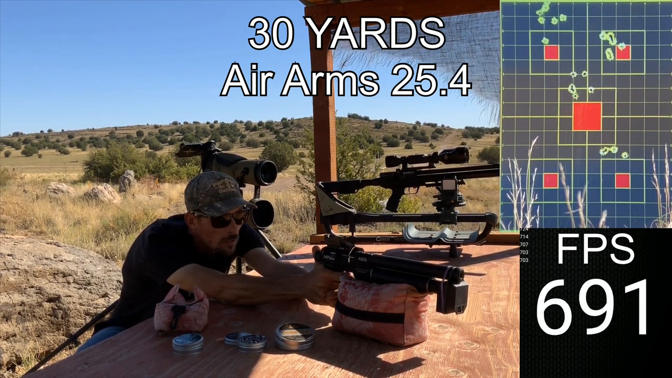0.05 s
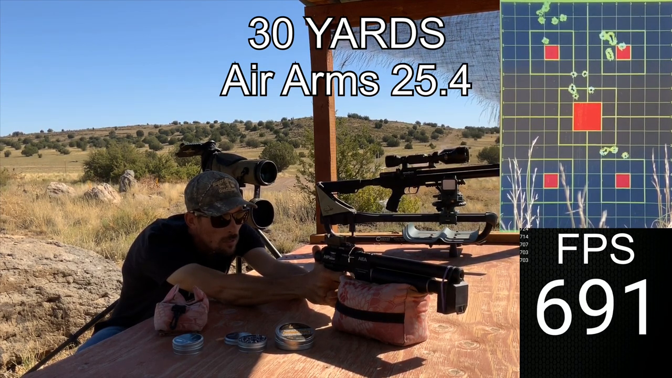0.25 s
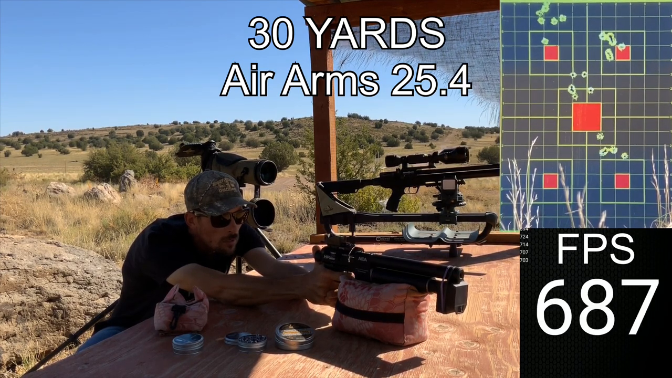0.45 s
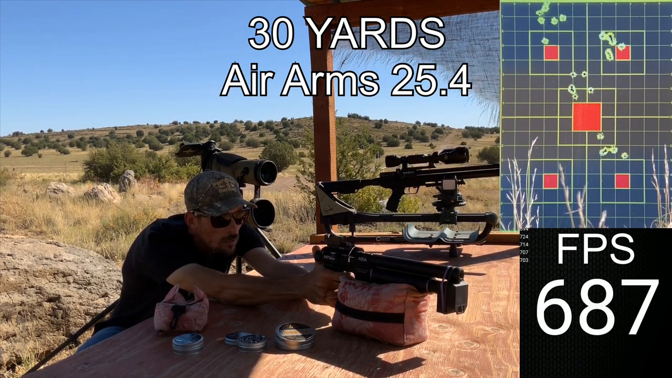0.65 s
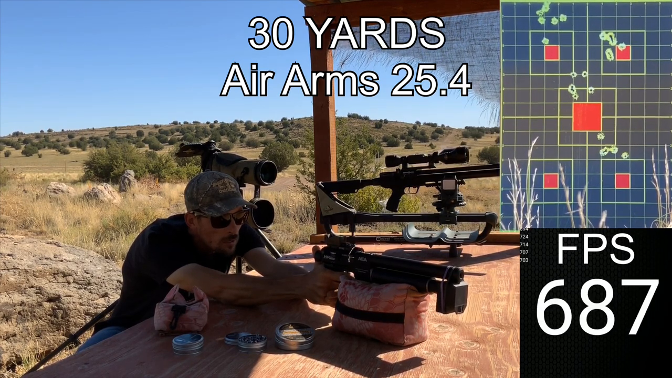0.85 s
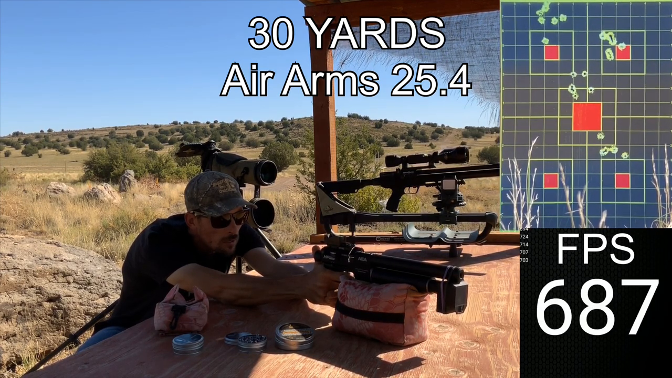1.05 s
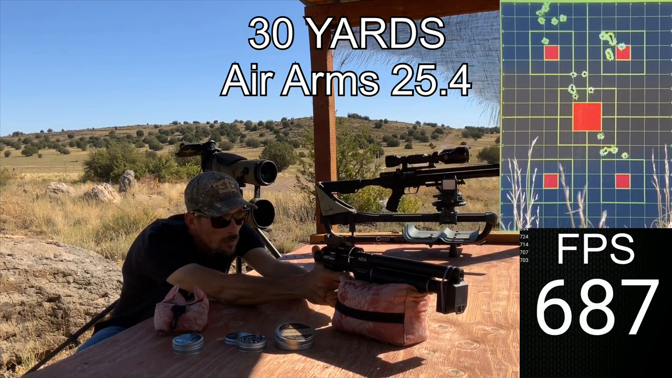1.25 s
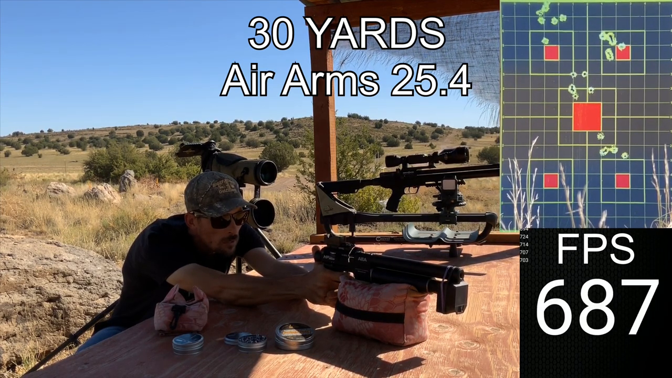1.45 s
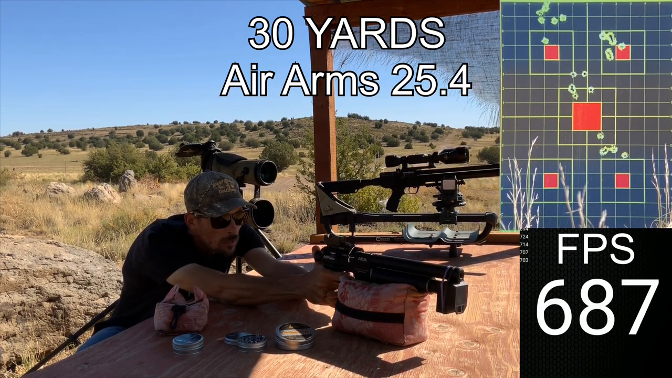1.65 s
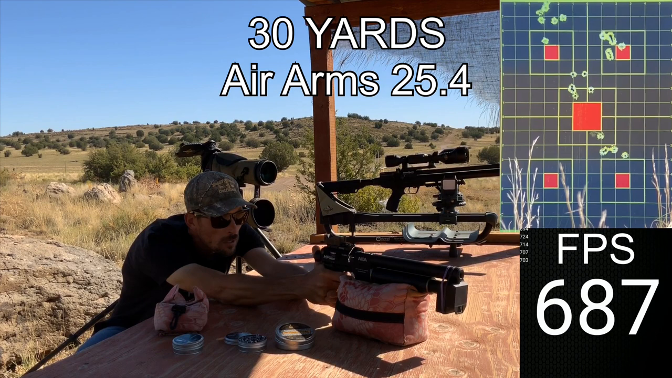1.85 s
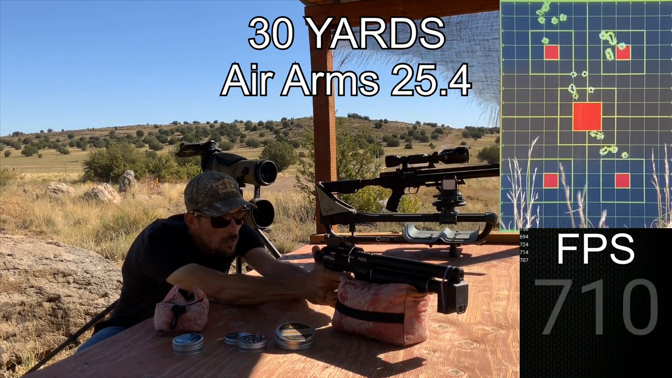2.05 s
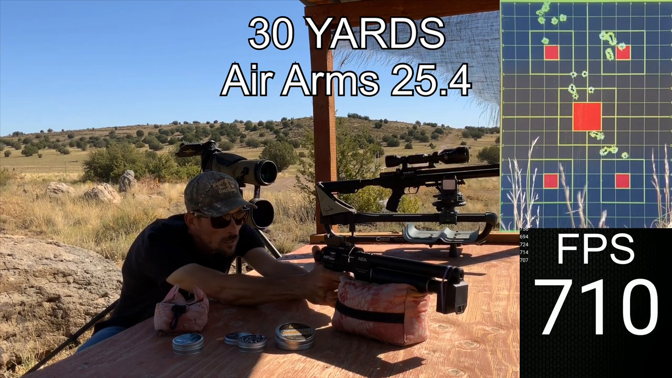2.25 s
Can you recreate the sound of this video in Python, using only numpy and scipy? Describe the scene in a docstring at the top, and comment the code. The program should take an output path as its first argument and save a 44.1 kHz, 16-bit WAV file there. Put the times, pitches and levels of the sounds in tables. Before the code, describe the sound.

Two sharp air pistol shots with short echoes, the pellets clinking on distant metal.

```python
"""Outdoor range, stereo microphone by a wooden bench under a shelter; a distant motor hums faintly.
At 0.2 s an air pistol fires close by: a sharp blast of air, a clack of the action, a low boom of the
bench, a wash from shelter and hillside. A quarter second later the pellet is heard hitting the target
and its ringing metal backstop downrange. The hum swells and sinks, and at 1.75 s comes a second shot,
followed by a dull knock, some clatter and light ticks of handling."""
import sys
import numpy as np
from scipy import signal
from scipy.fft import rfft, irfft
from scipy.io import wavfile
from scipy.ndimage import uniform_filter1d

SR = 44100
rng = np.random.default_rng(int(sys.argv[2]) if len(sys.argv) > 2 else 0)


def int16_out(signal):
    """Quantize to a 16-bit WAV file."""
    q = np.round(np.clip(np.atleast_2d(signal).T, -1, 1) * 32767)
    wavfile.write(sys.argv[1], SR, q.astype(np.int16))


N = 101430

# the two shots: start_s, level_db
SHOTS = [(0.200, 1), (1.7538, 1)]
# bursts at the pistol, close to the microphone: delay_s, level_db, attack_s, hold_s, t60_s
BLAST = [(-0.0082, -13.5, 0.014, .008, 0.097)]
CLACKS = [(.0428, -14, 0.00065, 0.0042, .03), (.047, -24, 0.0013, .003, 0.047)]
VENT = [(.0548, -12, 0.0016, .002, 0.027), (.061, -25.5, .003, .003, 0.1)]
CLOSING = [(.0585, -17.5, 0.0014, 0.003, 0.059)]
# their spectra: frequency_hz, gain_db
BLAST_COLOUR = [(150, -45.5), (250, -11.5), (651, -11), (906, 3), (1060, -7), (1240, -3.5), (1670, -4),
                (2400, -14.5), (2620, -5), (3580, -5.5), (4340, -1.5), (6820, 0.5), (7840, -9.5),
                (11700, -19), (16000, -30.5)]
CLACK_COLOUR = [(150, -5), (300, -4), (560, -4), (850, -1.5), (1400, -5.5), (3100, -13), (5400, -6),
                (7500, -11.5), (12000, -17.5), (16000, -21)]
VENT_COLOUR = [(400, -9.5), (700, -6.5), (1200, -3), (2600, -13), (4500, -6.5), (7500, -8.5), (9500, -4),
               (11000, 2), (13000, -9.5), (15800, -4)]
CLOSING_COLOUR = [(200, -0.5), (380, 4), (560, -11.5), (850, -3), (1700, -2), (2600, -18), (5400, -12),
                  (8000, -21), (16000, -28)]
# stereo width up close: frequency_hz, side_minus_mid_db
BLAST_WIDTH = [(200, -23), (1000, -24.5), (2000, -13.5), (4000, -29), (15000, -25.5)]
CLACK_WIDTH = [(150, -4), (400, -3), (1000, -4.5), (2000, 2.5), (5000, -1.5), (12000, -7.5)]
NEAR_WIDTH = [(200, -13), (400, -16.5), (1000, -11.5), (2000, -4), (5000, -8), (9000, -21), (15000, -27.5)]

def pistol():
    """Close by, air leaves the muzzle; the action clacks open, vents a bright spit and closes."""
    blast = each_shot(BLAST, BLAST_COLOUR, BLAST_WIDTH)
    clacks = each_shot(CLACKS, CLACK_COLOUR, CLACK_WIDTH)
    vent = each_shot(VENT, VENT_COLOUR, NEAR_WIDTH)
    closing = each_shot(CLOSING, CLOSING_COLOUR, NEAR_WIDTH)
    return blast + clacks + vent + closing


# pushes on the bench after each shot: delay_s, level_db
PUSHES = [(.0179, -11), (0.0255, -5.5), (0.0301, -2.2), (.051, 2), (0.0852, -9)]
# modes of the bench top: pitch_hz, level_db, t60_s
BENCH_MODES = [(77.3, -21, .46), (123.8, -23, 0.66), (132.2, -17, 0.45), (153.6, -24, .21),
               (197.5, -37.5, .15), (279, -40.5, .25)]
# loose wood shaking: delay_s, level_db, attack_s, hold_s, t60_s
RUMBLE = [(.02, -36, 0.024, 0.013, 0.15)]
# its spectrum: frequency_hz, gain_db
RUMBLE_COLOUR = [(70, -7), (120, 2.5), (200, 0.5), (400, -7), (600, -23)]
# its width: frequency_hz, side_minus_mid_db
RUMBLE_WIDTH = [(100, -5.5), (400, -6.5)]

def bench():
    """Under the pistol, the shot and the action push the bench top, which booms and rumbles."""
    boom = sum(ring(start + delay, hz, shot_db + push_db + db, t60)
               for start, shot_db in SHOTS
               for delay, push_db in PUSHES
               for hz, db, t60 in BENCH_MODES)
    return bass_cut(boom) + each_shot(RUMBLE, RUMBLE_COLOUR, RUMBLE_WIDTH)


# pellet impacts as they reach the microphone: delay_s, level_db, attack_s, hold_s, t60_s
TAP = [(.2025, -37, 0.0026, 0.0038, 0.15)]
CRACKS = [(.2397, -23.5, 0.00034, 0.0014, 0.011), (.2435, -26.5, 0.00081, 0.013, 0.12)]
CLANG = [(.257, -26.5, 0.0036, 0.0038, 0.24)]
SPLATTER = [(.257, -36, 0.0027, 0.0059, 0.11)]
# their spectra: frequency_hz, gain_db
TAP_COLOUR = [(300, -2), (700, -43), (1200, -11), (1650, -3), (1950, 12.5), (2400, -19), (4000, -28),
              (12000, -37)]
CRACK_COLOUR = [(300, -9), (700, -12), (1200, -6.5), (2000, 6), (2800, -16.5), (4500, -19), (6300, -3.5),
                (8300, -3), (9800, -22.5), (15000, -30)]
CLANG_COLOUR = [(150, -15), (350, -11.5), (700, -4), (1000, 9), (1500, 5), (2100, -4.5), (2800, -22.5),
                (4400, -18.5), (5500, -5), (9000, -39), (15000, -53)]
SPLATTER_COLOUR = [(4000, -17), (8500, -16), (11000, -1.5), (12700, -16), (14000, -13), (16000, -29)]
# width of distant or scattered sound: frequency_hz, side_minus_mid_db
DIFFUSE_WIDTH = [(100, -21), (400, -14.5), (1000, -8.5), (2000, -5), (5000, -3.5), (9000, -12.5),
                 (15000, -25)]
# direction of the target: frequency_hz, left_minus_right_db
TARGET_BALANCE = [(380, 1.5), (700, 2.5), (1290, 2.5), (2380, 6), (4400, -0.5), (8120, -4.5), (15000, 4)]
# modes of the metal plate: pitch_hz, level_db, t60_s
PLATE_MODES = [(751, -47, 0.65), (970, -42.5, 0.28), (1067, -42, 0.25), (1147, -48, 0.59),
               (1360, -39, 0.33), (1523, -34, 0.32), (1580, -37, 0.42), (1639, -38, 0.49),
               (1670, -33, 0.37), (1890, -53, .95), (1986, -26, 0.16), (2149, -52.5, 1.45),
               (2316, -43, 0.46), (2368, -51, .5), (3050, -60, 0.7), (3620, -57, .5), (5222, -48, 0.34),
               (6000, -51, 0.31)]
PLATE_DELAY_S, PLATE_SPREAD_S = .262, .00015

def backstop():
    """Downrange, the pellet taps the card, cracks into the metal and splatters; the plate rings on."""
    impacts = [(TAP, TAP_COLOUR), (CRACKS, CRACK_COLOUR),
               (CLANG, CLANG_COLOUR), (SPLATTER, SPLATTER_COLOUR)]
    hit = sum(each_shot(bursts, colour, DIFFUSE_WIDTH) for bursts, colour in impacts)
    lags = rng.uniform(0, PLATE_SPREAD_S, (len(PLATE_MODES), 2))  # per mode and channel
    plate = sum(np.array([ring(start + PLATE_DELAY_S + lag, hz, shot_db + db, t60) for lag in pair])
                for start, shot_db in SHOTS
                for (hz, db, t60), pair in zip(PLATE_MODES, lags))
    return np.array([shape(channel, [(hz, sign * db / 2) for hz, db in TARGET_BALANCE])
                     for channel, sign in zip(hit + plate, (1, -1))])


# scatter of each shot: delay_s, level_db, attack_s, hold_s, t60_s
SHELTER = [(.05, -30, 0.017, .005, .25)]
HILLSIDE = [(.15, -41, 0.034, 0.095, 0.68)]
# its spectra: frequency_hz, gain_db
SHELTER_COLOUR = [(120, -23), (200, 0.5), (394, -24.5), (538, -19.5), (683, -24), (1300, -14.5),
                  (2650, -32), (5230, -27.5), (5840, -25.5), (10700, -28.5), (16000, -47.5)]
HILLSIDE_COLOUR = [(100, 7), (200, 7), (400, -13), (1000, -7.5), (1800, -6), (2800, -20.5), (5800, -21),
                   (9000, -26.5), (15000, -39)]

def echoes():
    """A short wash returns from the shelter overhead, a longer one from the hillside farther off."""
    shelter = each_shot(SHELTER, SHELTER_COLOUR, DIFFUSE_WIDTH)
    return shelter + each_shot(HILLSIDE, HILLSIDE_COLOUR, DIFFUSE_WIDTH)


# low tones of the knock: start_s, level_db, pitch_hz, t60_s
THUDS = [(2.032, -12.5, 208.4, 0.057), (2.033, -26, 134.9, 0.51), (2.095, -25.5, 114, .3)]
# small handling noises: start_s, level_db, attack_s, hold_s, t60_s
CLATTER = [(2.031, -26, 0.00085, 0.001, 0.036), (2.052, -39.5, 0.012, 0.037, 0.42)]
TICKS = [(0.185, -47, 0.0024, 0.0033, 0.022), (1.848, -56, .001, 0.0011, 0.028),
         (2.093, -54, 0.018, .02, .2), (2.128, -55, 0.00082, .001, .03), (2.158, -48.5, .001, .001, .025),
         (2.193, -56.5, .001, 0.0011, 0.038), (2.218, -58.5, 0.0013, 0.0018, .05)]
# their spectra: frequency_hz, gain_db
CLATTER_COLOUR = [(100, 6), (250, 4.5), (500, -2), (720, 3), (1000, -0.5), (2500, -19.5), (6000, -26),
                  (15000, -44)]
TICK_COLOUR = [(1000, -13.5), (3000, 0.5), (5500, 1.5), (8500, -6), (11000, -8), (15000, -17)]

def handling():
    """A dull knock with some clatter after the second shot, and a few light ticks."""
    knock = sum(ring(start, hz, db, t60) for start, db, hz, t60 in THUDS)
    clatter = noise(CLATTER_COLOUR, DIFFUSE_WIDTH) * sum(envelope(*row) for row in CLATTER)
    ticks = noise(TICK_COLOUR, NEAR_WIDTH) * sum(envelope(*row) for row in TICKS)
    return bass_cut(bass_cut(knock)) + clatter + ticks


# partials of the motor: harmonic, level_db
HUM = [(1, -56.5), (2, -56.5), (3, -61.5), (4, -73), (5, -81.5), (6, -84), (7, -84.5)]
# swell of its overtones: time_s, gain_db
HUM_SWELL = [(0, -9), (.6, -10.5), (.9, -2), (1.15, -2), (1.4, 3.5), (1.55, -1.5), (1.65, -7.5), (2.3, -6)]
HUM_HZ, HUM_WAVER = 83.06, .0055

def motor():
    """Far off, a motor hums at a slightly wavering pitch; its overtones swell between the shots."""
    pitch_hz = HUM_HZ * (1 + HUM_WAVER * wander(6))
    phase = 2 * np.pi * np.cumsum(pitch_hz) / SR
    swell = undb(np.interp(np.arange(N) / SR, *np.array(HUM_SWELL).T))
    hum = 0
    for harmonic, db in HUM:
        partial = np.sqrt(2) * undb(db) * np.sin(harmonic * phase + rng.uniform(0, 2 * np.pi))
        hum += partial * (swell if harmonic > 1 else 1)
    return hum


# spectrum of the open air: frequency_hz, gain_db
AIR_COLOUR = [(30, -36.5), (55, -18.5), (78, -1.5), (105, -2.5), (135, -1.5), (200, -11), (300, -19.5),
              (450, -23.5), (700, -28), (1200, -31.5), (2500, -37.5), (6000, -41), (11000, -42.5),
              (16000, -48.5)]
# its width: frequency_hz, side_minus_mid_db
AIR_WIDTH = [(60, -14.5), (400, -18.5), (1000, -14.5), (2000, -12), (4400, -20), (15000, -23.5)]
AIR_DB, AIR_FLUTTER_DB = -57, 1

def open_air():
    """A quiet, low rush around the microphone, its level fluttering slightly."""
    return noise(AIR_COLOUR, AIR_WIDTH, ripple_db=0) * undb(AIR_DB + AIR_FLUTTER_DB * wander(54))


def each_shot(bursts, colour, width, shared=.85):
    """Noise bursts timed from every shot, sharing most of their fine texture."""
    common = noise(colour, width)
    out = 0
    for start, db in SHOTS:
        repeated = np.sqrt(shared) * np.roll(common, int(start * SR), axis=1)
        fresh = np.sqrt(1 - shared) * noise(colour, width)
        contour = sum(envelope(start + delay, *rest) for delay, *rest in bursts)
        out += undb(db) * (repeated + fresh) * contour
    return out


def noise(colour, width, ripple_db=3.5, spacing_hz=22):
    """Stereo noise of rms 1, full of small resonances, falling away below its lowest point."""
    lowest_hz, lowest_db = colour[0]
    colour = [(lowest_hz / 2, lowest_db - 30), *colour]
    hz = np.arange(500, SR / 2, spacing_hz)
    resonance_db = ripple_db * rng.standard_normal(len(hz)).clip(-2, 2) * (hz > hz[0])
    ripple = np.column_stack([hz, resonance_db])
    mid, side = (shape(shape(rng.standard_normal(N), colour), ripple) for _ in range(2))
    pair = mid + shape(side, width) * np.array([[1], [-1]])
    return pair / pair.std()


def envelope(start, db, attack, hold, t60):
    """Swelling attack, hold and exponential release."""
    t = np.arange(N) / SR - start
    rise = np.clip(t / attack, 0, 1) ** 2
    release = np.exp(-np.log(1000) * np.maximum(t - attack - hold, 0) / t60)
    return undb(db) * rise * release


def ring(start, hz, db, t60):
    """One struck mode dying away."""
    t = np.maximum(np.arange(N) / SR - start, 0)
    return undb(db) * np.sin(2 * np.pi * hz * t) * np.exp(-np.log(1000) * t / t60)


def wander(rate_hz):
    """Smooth random drift with a spread of 1."""
    span = int(SR / rate_hz)
    steps = np.repeat(rng.standard_normal(N // span + 1), span)
    drift = uniform_filter1d(uniform_filter1d(steps, span), span)[:N]
    return drift / drift.std()


def shape(x, points):
    """Filter by a curve of (frequency_hz, gain_db) points."""
    hz, db = np.array(points, float).T
    bins_hz = np.maximum(np.fft.rfftfreq(N, 1 / SR), 1)
    return irfft(rfft(x) * undb(np.interp(np.log(bins_hz), np.log(hz), db)), N)


def bass_cut(x, corner_hz=110):
    """Small panels radiate little deep bass."""
    return signal.sosfilt(signal.butter(2, corner_hz, "high", fs=SR, output="sos"), x)


def undb(db):
    """Decibels to gain."""
    return 10 ** (np.asarray(db) / 20)


def scene():
    """The range as it reaches the microphone."""
    return pistol() + bench() + backstop() + echoes() + handling() + motor() + open_air()


PEAK_CAP, TOP_HZ = .8, 15750

def record(dry):
    """The recorder caps the highest peaks and cuts the top treble."""
    capped = np.clip(dry, -PEAK_CAP, PEAK_CAP)
    return signal.sosfilt(signal.ellip(10, .2, 80, TOP_HZ, fs=SR, output="sos"), capped)


dry = scene()
out = record(dry)
int16_out(out)
```